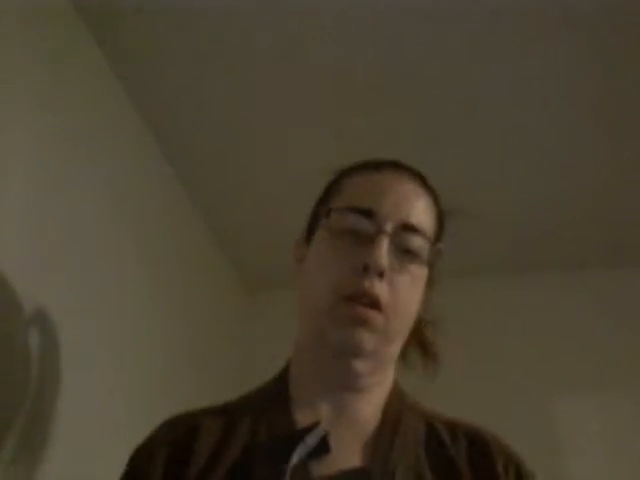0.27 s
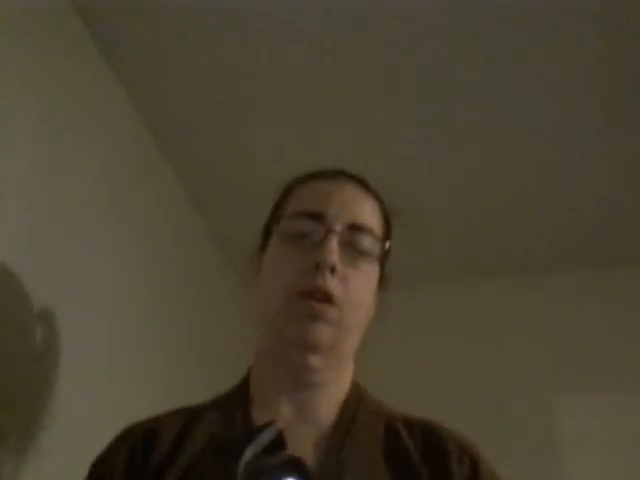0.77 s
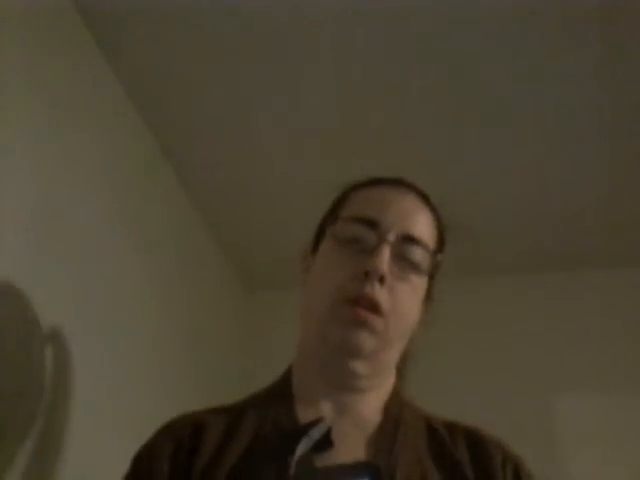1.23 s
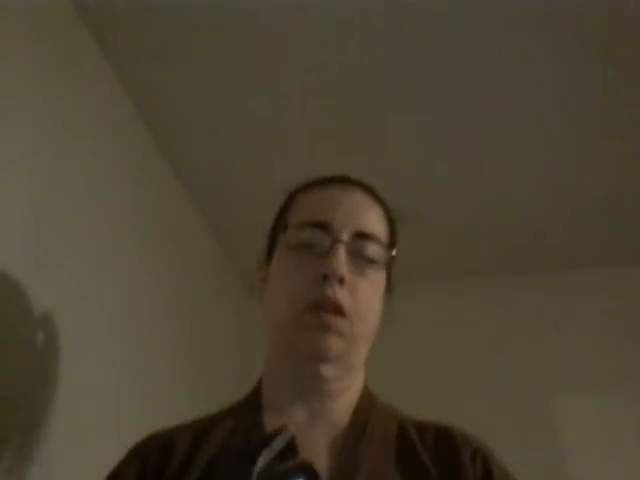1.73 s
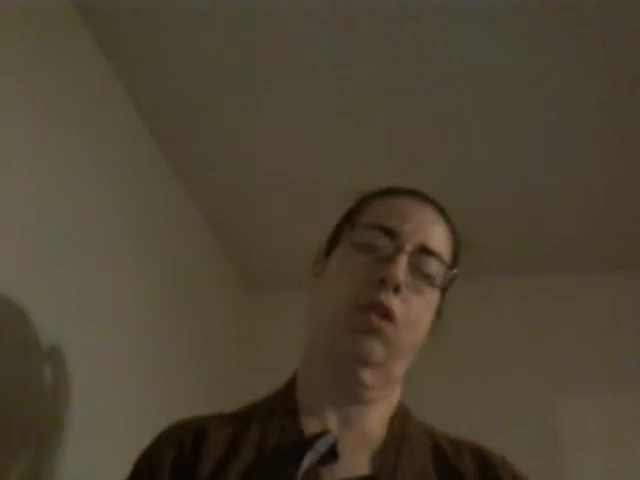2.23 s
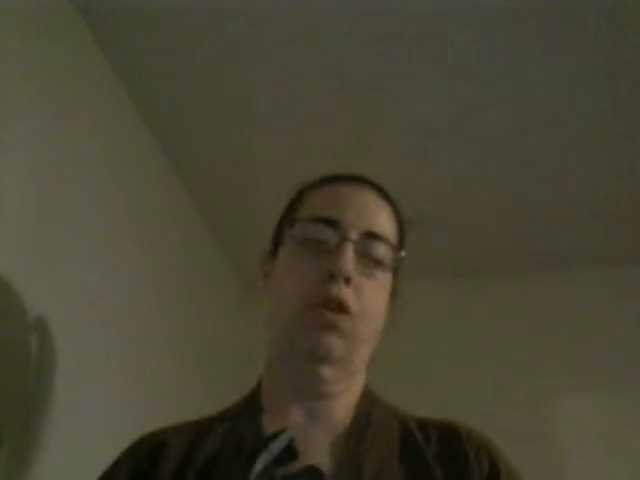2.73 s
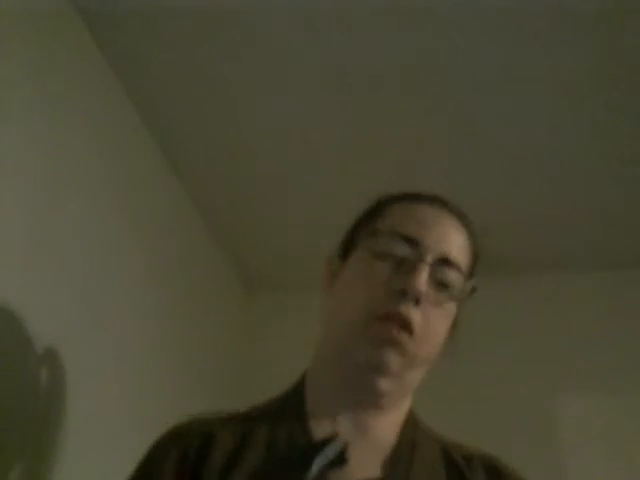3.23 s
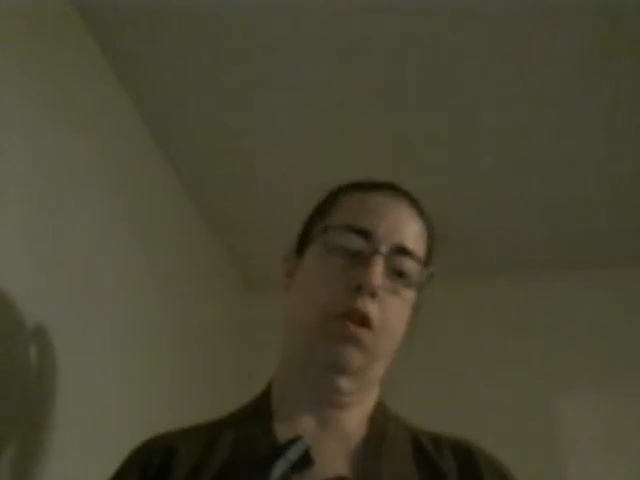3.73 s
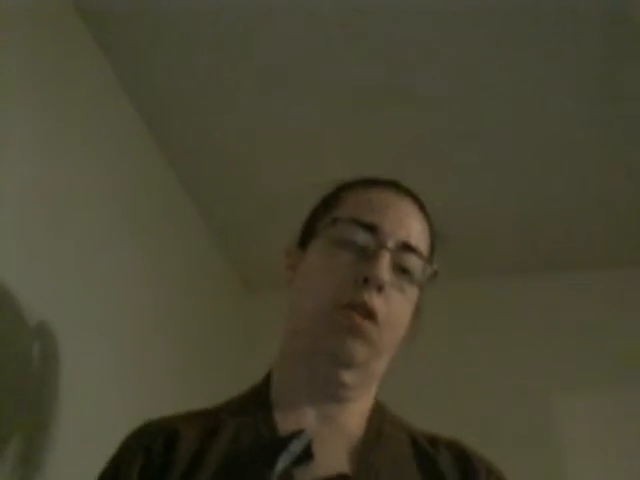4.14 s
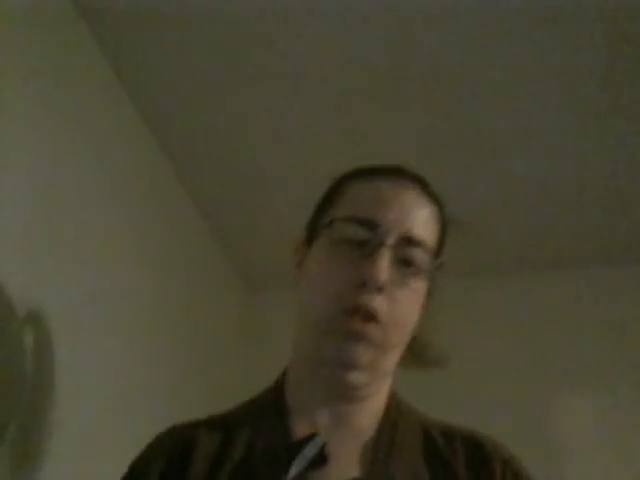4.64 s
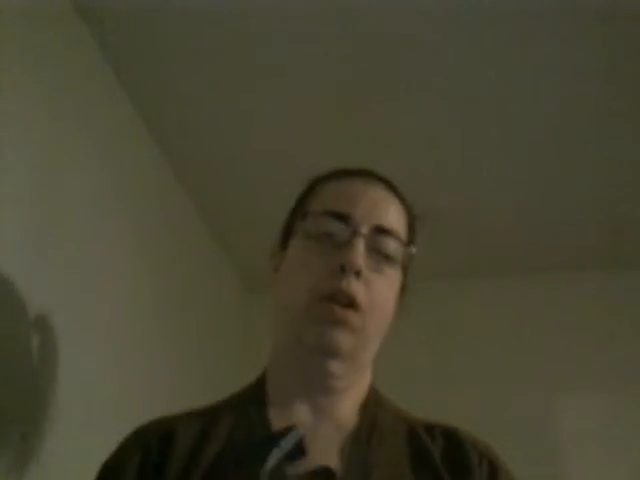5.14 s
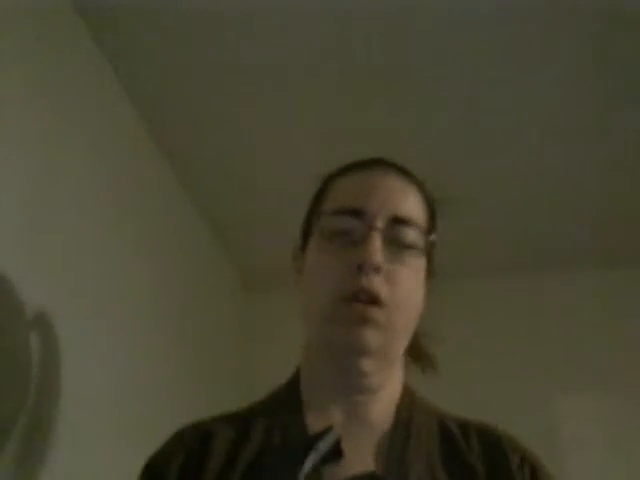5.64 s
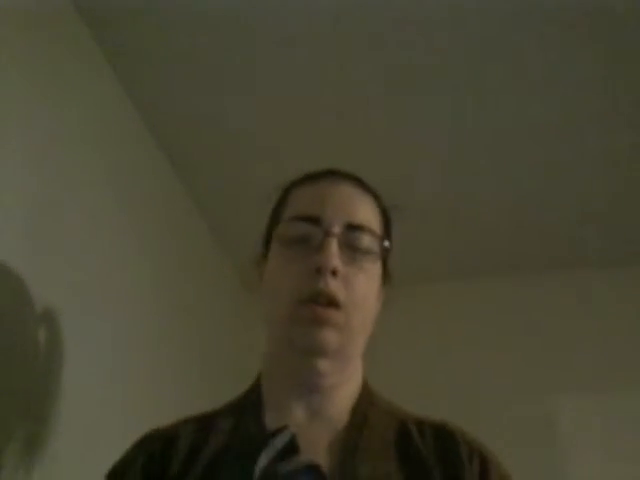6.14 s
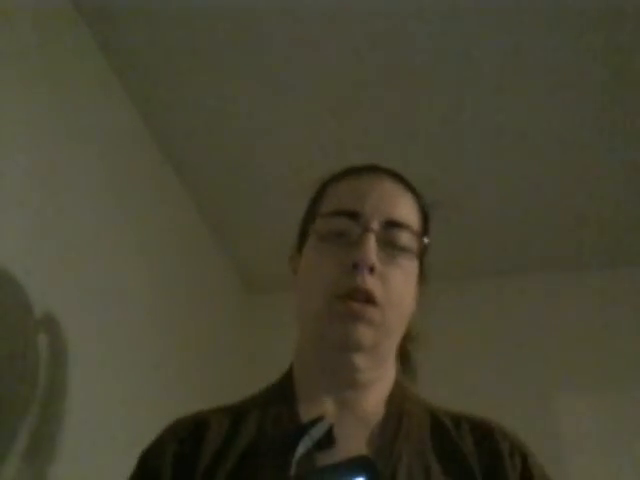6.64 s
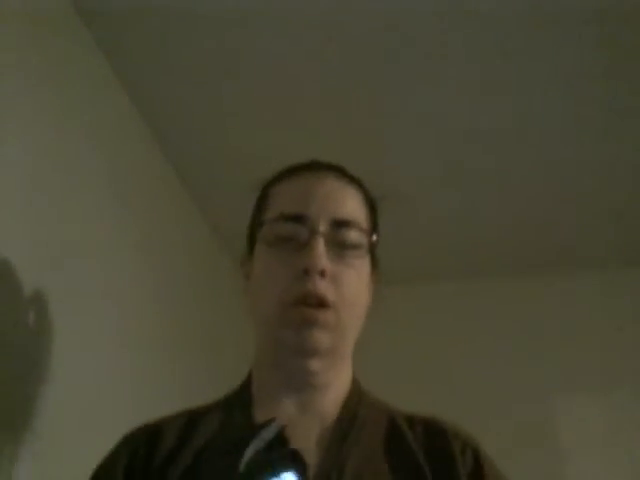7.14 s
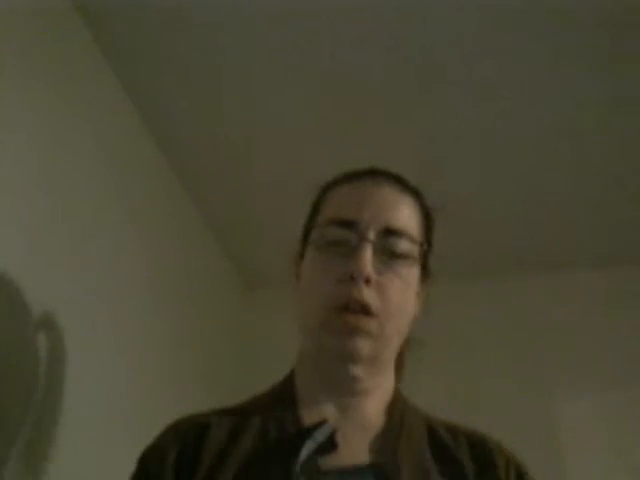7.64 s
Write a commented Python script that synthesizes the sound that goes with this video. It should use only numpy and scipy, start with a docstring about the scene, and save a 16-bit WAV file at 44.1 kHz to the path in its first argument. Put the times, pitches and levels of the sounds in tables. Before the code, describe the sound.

Someone walks steadily on a treadmill in a small room, feet thudding on the deck over a sagging motor whine and hiss, with early shoe squeaks.

```python
"""Someone walks on a treadmill in a small room, a little under two steps a second.
Motor whine, belt drone and noise hiss run throughout; in each step the shoe clacks off the belt and
brushes it twice, then heel and sole slap down, ring the deck modes and load it with rumble and grit.
Most of the stick-slip sole squeaks come in the first 2.3 s; the heavy foot's shoe ticks after full load.
The whine then sags and recovers by the next step; the last step slaps hardest."""
import sys
import numpy as np
from scipy import signal
from scipy.fft import rfft, irfft
from scipy.io import wavfile
from scipy.ndimage import uniform_filter1d

SR = 44100
rng = np.random.default_rng(int(sys.argv[2]) if len(sys.argv) > 2 else 0)


def persist_wave(psi):
    """Save psi, clipped to +-1, as 16-bit WAV."""
    counts = np.round(np.clip(psi, -1, 1) * 32767).astype(np.int16)
    wavfile.write(sys.argv[1], SR, np.atleast_2d(counts).T)


N = 347301
TIME = np.arange(N) / SR

# Steps, light and heavy foot by turns, light first. Each row: full load in seconds, lift-off lead and
# heel strike lead in seconds before it, then relative levels in dB of weight, thump, slap, sole grit,
# brush after lift-off and scuff before landing.
STEP_ROWS = [(0.069, .18, .028, -32.5, -27.5, -46, -42, -45, -36.5),
             (.587, 0.17, .054, -27.5, -17.5, -31, -33, -38, -47),
             (1.133, 0.17, 0.037, -30, -32, -48, -40.5, -58, -45),
             (1.676, 0.19, 0.067, -32.5, -22.5, -36, -35.5, -42, -45),
             (2.229, 0.18, 0.033, -29.5, -26, -34, -40, -53, -48),
             (2.758, .195, 0.057, -30.5, -24, -36.5, -36.5, -36, -44.5),
             (3.296, .18, 0.036, -32, -24, -33.5, -42.5, -40, -43.5),
             (3.824, 0.18, 0.053, -30, -23, -48, -34, -38, -46.5),
             (4.357, 0.16, .033, -29.5, -27.5, -33, -41.5, -40, -37.5),
             (4.886, 0.1874, .039, -30.5, -21.5, -33.5, -36.5, -37, -46),
             (5.41, .16, .034, -29.5, -29, -34, -42, -41.5, -41),
             (5.937, .178, 0.065, -30.5, -18.5, -37.5, -36, -40.5, -51),
             (6.475, 0.16, 0.032, -32, -28, -44, -41, -41, -40.5),
             (7.003, 0.1805, 0.068, -29.5, -21.5, -41, -34.5, -39.5, -48),
             (7.555, .18, 0.033, -24.5, -20.5, -23.5, -42, -45.5, -45)]


def amp(db):
    """Amplitude factor of a level in dB."""
    return 10 ** (np.asarray(db) / 20)


def unit(x):
    """Scales x to rms 1."""
    return x / np.sqrt(np.mean(x ** 2) + 1e-20)


def read(points, hz):
    """Interpolates a table of Hz and value on a log-frequency axis."""
    f, value = np.transpose(points)
    return np.interp(np.log(hz + 1), np.log(f + 1), value)


def colour(x, points):
    """Filters x by a spectrum table in dB."""
    hz = np.fft.rfftfreq(len(x), 1 / SR)
    return irfft(rfft(x) * amp(read(points, hz)), len(x))


def noise(points):
    """Steady Gaussian noise of rms 1 with the given spectrum."""
    return unit(colour(rng.standard_normal(N), points))


def wander(hz, size):
    """Random fluctuation, lowpassed at about hz; rms 1 before it is cut to size."""
    full = max(size, SR)
    f = np.fft.rfftfreq(full, 1 / SR)
    spectrum = rfft(rng.standard_normal(full)) * np.exp(-(f / hz) ** 2)
    return unit(irfft(spectrum, full))[:size]


def grains(points, per_s, smooth):
    """Tiny slips of uneven size over a smooth rub."""
    slips = rng.standard_normal(N) * (rng.random(N) < per_s / SR)
    rub = smooth * rng.standard_normal(N)
    return unit(colour(unit(slips) + rub, points))


def nearby(s):
    """The samples within a second of time s."""
    return slice(max(int((s - 1) * SR), 0), int((s + 1) * SR))


def swell(s, rise, fall):
    """A rounded hump at time s: Gaussian front, exponential tail."""
    out = np.zeros(N)
    lag = TIME[nearby(s)] - s
    front = -.5 * (lag / rise) ** 2
    tail = 1 - np.sqrt(1 + (lag / fall) ** 2)
    out[nearby(s)] = np.exp(np.where(lag < 0, front, tail))
    return out


def burst(s, rise, fall):
    """A quick rise from time s and an exponential fall."""
    out = np.zeros(N)
    t = np.maximum(TIME[nearby(s)] - s, 0)
    out[nearby(s)] = (1 - np.exp(-t / rise)) * np.exp(-t / fall)
    return out


def add(mix, s, sound):
    """Adds sound to mix in place, from time s."""
    part = mix[max(round(s * SR), 0):][:len(sound)]
    part += sound[:len(part)]


def room(x, wet_db):
    """Direct sound plus dense reflections whose decay time depends on frequency."""
    # Each row: frequency in Hz, t60 in s.
    decay = [(150, 0.35), (500, 0.47), (2000, 0.23), (5000, 0.29), (12000, 0.21)]
    size = SR // 2
    taps = rng.standard_normal(size) * (rng.random(size) < .1)
    taps *= np.arange(size) > SR // 300  # no reflection in the first 3.3 ms
    hz, t, z = signal.stft(taps, SR, nperseg=256)
    tail = signal.istft(z * amp(-60 * t / read(decay, hz)[:, None]), SR, nperseg=256)[1]
    wet = signal.fftconvolve(x, tail / np.linalg.norm(tail))[:N]
    return (x + amp(wet_db) * wet) / np.hypot(1, amp(wet_db))


def steps():
    """The step rows, each led by its foot: 0 light, 1 heavy."""
    return [(k % 2, *row) for k, row in enumerate(STEP_ROWS)]


def skims():
    """Each swing touches the belt after lift-off and before landing: (s, relative dB, width s)."""
    brush_lag_s, brush_width_s = (0.022, 0.023), (0.013, 0.014)  # light, heavy foot
    scuff_lead_s, scuff_width_s = 0.081, 0.0094
    rows = []
    for foot, s, swing_s, *_, brush_db, scuff_db in steps():
        rows.append((s - swing_s + brush_lag_s[foot], brush_db, brush_width_s[foot]))
        rows.append((s - scuff_lead_s, scuff_db, scuff_width_s))
    return rows


def blows():
    """Each step strikes with heel, then sole: (s, relative thump dB, relative slap dB)."""
    sole_lag_s = (0.0051, -0.00702)  # light, heavy foot, from full load
    sole_thump_db, sole_slap_db = (-6, 0), (-11.5, -4)  # relative to the heel
    rows = []
    for foot, s, _, heel_lead_s, _, thump_db, slap_db, *_ in steps():
        rows.append((s - heel_lead_s, thump_db, slap_db))
        rows.append((s + sole_lag_s[foot], thump_db + sole_thump_db[foot], slap_db + sole_slap_db[foot]))
    return rows


def hiss():
    """Steady coloured noise with a slight slow level wander."""
    # Each row: frequency in Hz, relative density in dB per Hz.
    spectrum = [(500, -0.5), (1600, -2.5), (2600, 0), (3300, -1.5), (4050, 1.5), (4800, -1.5), (6000, 5),
                (7500, 5), (9500, 0), (11500, -6), (13000, -17), (15000, -23)]
    return amp(-54.0) * noise(spectrum) * amp(0.31 * wander(3.0, N))


def whine_pitch():
    """Whine pitch in Hz: each step drags the motor down quickly, and it recovers by the next."""
    crest_hz, crest_lag_s = 417.85, 0.012  # before smoothing; lag after full load
    sag_s, recovery_power = 0.215, 1.7
    sag_hz, sag_hz_per_db = (54.54, 65.1), (0.5, 2.5)  # light, heavy foot; more weight, deeper sag
    usual_weight_db = -30.5
    crests = np.array([row[0] for row in STEP_ROWS]) + crest_lag_s
    stride_s = np.diff(crests).mean()
    crests = np.r_[crests[0] - stride_s, crests, crests[-1] + stride_s]  # the walk goes on either side
    sags = [sag_hz[1]]
    for foot, _, _, _, weight_db, *_ in steps():
        sags.append(sag_hz[foot] + sag_hz_per_db[foot] * (weight_db - usual_weight_db))
    pitch = np.full(N, crest_hz)
    for start, end, sag in zip(crests, crests[1:], sags):
        slowing = np.sin(np.pi / 2 * np.interp(TIME, [start, start + sag_s], [0, 1])) ** 2
        recovery = np.interp(TIME, [start + sag_s, end], [0, 1]) ** recovery_power
        pitch -= sag * slowing * (1 - recovery)
    return uniform_filter1d(pitch, size=1500)  # 34 ms


def motor():
    """A nearly pure whine follows the motor's speed through room modes, over belt and roller drone."""
    # Standing waves of the room, with a null. Each row: pitch in Hz, relative whine level in dB.
    standing = [(349, -40), (353, -49), (356, -54), (360, -47), (370, -42), (400, -39), (422, -47)]
    # Each row: frequency in Hz, relative density in dB per Hz.
    drone_spectrum = [(20, -44), (50, -20), (100, -12), (130, -7), (170, -1), (235, 2), (330, -0.5),
                      (480, -8), (640, -11), (720, -10), (830, -13), (1150, -17), (1600, -16), (3000, -29)]
    pitch = whine_pitch()
    phase = 2 * np.pi * np.cumsum(pitch * (1 + 0.0016 * wander(25, N))) / SR
    tone = np.sin(phase) + amp(-27.5) * np.sin(2 * phase)
    speeding_up = np.tanh(np.gradient(pitch) * SR / 100)  # louder while it gathers speed
    whine = unit(tone) * amp(read(standing, pitch) + 1.0 * speeding_up + 2.0 * wander(22, N))
    drone = amp(-49.0) * noise(drone_spectrum) * amp(1.53 * wander(8.7, N))
    return whine + drone


def brushes():
    """The swinging shoe skims the belt with a short bright hiss; cloth swishes more slowly."""
    # Each row: time in seconds, relative level in dB, rise width in seconds.
    swishes = [(2.44, -51.5, 0.12), (5.12, -53.5, 0.14), (6.58, -49, 0.05), (7.82, -52.5, 0.15)]
    # Shoe and cloth spectra. Each row: frequency in Hz, relative density in dB per Hz.
    shoe_spectrum = [(300, -51), (950, 2), (1500, -7), (2600, -6.5), (4000, -1), (5300, 1), (7200, 4),
                     (9500, -6), (12000, -11), (15000, -27)]
    cloth_spectrum = [(1500, -6), (3200, -8.5), (4050, -6), (4900, -11), (6000, 1.5), (7600, -8),
                      (10000, -13), (14000, -24)]
    shoe, cloth = np.zeros((2, N))
    for s, db, width in skims():
        shoe += amp(db) * swell(s - 0.21 * width, 0.79 * width, 1.42 * width)
    for s, db, width in swishes:
        cloth += amp(db) * swell(s, width, 0.81 * width)
    return room(shoe * grains(shoe_spectrum, 3000, 1.0) + cloth * noise(cloth_spectrum), wet_db=-6.0)


def ticks():
    """The heavy foot's shoe flexes just after full load: brief, jittery high chirps."""
    lag_s, peak_db, centre_hz, rise_s = 0.025, -28.5, 6700, 0.0026
    t = np.arange(SR // 30) / SR
    out = np.zeros(N)
    for s, *_ in STEP_ROWS[1::2]:
        phase = 2 * np.pi * np.cumsum(centre_hz * (1 + 0.088 * wander(1600, len(t)))) / SR
        u = t / rise_s
        add(out, s + lag_s, amp(peak_db) * u * np.exp(1 - u) * np.sin(phase))
    return room(out, wet_db=-13.0)


def squeaks():
    """Rubber sticks and slips in two rough tones; overtones and sum tones ride on a rasp."""
    # Each row: start in seconds, rise in seconds, length in seconds, upper pitch in Hz, pitch jitter
    # as a share, then relative levels in dB of upper tone with overtones, lower tone with sum tones,
    # and rasp.
    rows = [(0.57, .01, 0.0313, 2505, 0.019, -10, -50, -27.5),
            (1.109, 0.022, 0.043, 2087, 0.0087, -17.5, -21.5, -27.5),
            (1.653, 0.021, 0.066, 2136, 0.042, -32, -32.5, -36.5),
            (2.197, 0.012, 0.049, 2117, 0.025, -14, -19.5, -25.5),
            (4.322, .007, 0.03, 2324, .13, -37.5, -44, -54),
            (6.975, 0.012, 0.0526, 2486, .12, -30.5, -37, -48),
            (7.52, 0.016, 0.053, 2065, 0.032, -5.5, -16.5, -19)]
    # Each row: frequency in Hz, relative density in dB per Hz.
    rasp_spectrum = [(300, -15), (1000, 4.5), (1350, -10.5), (1700, -36), (2400, 11.5), (3000, 1),
                     (3750, 3), (4450, 0.5), (4950, 0), (6200, 7), (7200, 3.5), (8200, 2), (11000, -8.5),
                     (15000, -24)]
    glide, wobble, fade_db = 0.05, 0.013, -10.5  # shares of pitch; fade from rise to end
    highs, lows, rub = np.zeros((3, N))
    for s, rise, length, hz, jitter, db, lower_db, rasp_db in rows:
        size = max(int(length * SR), 64)
        t = np.arange(size) / SR
        slide = 1 + glide * t / length + wobble * wander(120, size)  # the grip changes
        grip = np.minimum(t / rise, 1) ** 1.43
        grip *= amp(fade_db * np.interp(t, [rise, length], [0, 1]))
        grip *= signal.windows.tukey(size, .15) * amp(2.4 * wander(205, size))
        upper, lower = (2 * np.pi * np.cumsum(f * slide * (1 + jitter * wander(800, size))) / SR
                        for f in (hz, .765 * hz))
        high = np.sin(upper) + amp(-13.5) * np.sin(2 * upper) + amp(-24) * np.sin(3 * upper)
        mixed = amp(-11.0) * np.sin(2 * lower) + amp(-6.0) * np.sin(upper + lower)
        mixed += amp(-14) * np.sin(2 * upper + lower)
        add(highs, s, grip * (amp(db) * high + amp(lower_db) * mixed))
        add(lows, s, grip * amp(lower_db) * np.sin(lower))
        rub += amp(rasp_db) * swell(s + rise, 0.51 * rise, 0.24 * length)  # the rasp outlasts the tone
    tones = room(highs, wet_db=-8.0) + room(lows, wet_db=-3.0)  # the lower tone lingers more
    rasp = room(amp(0.5) * rub * grains(rasp_spectrum, 2500, 0.82), wet_db=-2.5)
    return tones + rasp


def slaps():
    """The sole clacks softly as it leaves the belt and claps on it as it lands."""
    # Landing and leaving spectra. Each row: frequency in Hz, relative density in dB per Hz.
    slap_spectrum = [(200, -34), (400, 16.5), (560, 13.5), (750, 5), (1000, 3.5), (1300, -3), (1750, 0),
                     (2600, -5), (3400, -16), (5000, -37), (8000, -28), (14000, -49)]
    clack_spectrum = [(300, -8), (700, 3.5), (1000, 6), (1500, -5), (2200, -16), (5000, -38), (14000, -40)]
    clack_db = (-41, -53)  # light, heavy foot
    landing, leaving = np.zeros((2, N))
    for s, _, db in blows():
        landing += amp(db) * burst(s, 0.0026, 0.016)
    for foot, s, swing_s, *_ in steps():
        leaving += amp(clack_db[foot]) * burst(s - swing_s, 0.0009, 0.014)
    slap = amp(3.0) * landing * grains(slap_spectrum, 1500, 0.68)
    return room(slap + leaving * noise(clack_spectrum), wet_db=-7.0)


def footfalls():
    """Under the walker's weight the belt drags over the deck: low rumble and sole grit."""
    # Rumble and grit spectra. Each row: frequency in Hz, relative density in dB per Hz.
    rumble_spectrum = [(20, -52), (60, -20), (100, -11.5), (132, -15), (160, 4.5), (200, 3.5), (260, 1.5),
                       (330, 3), (480, -4), (700, -13), (1100, -18), (3000, -47)]
    grit_spectrum = [(200, -32), (600, 3.5), (1050, 7), (1350, 2), (1750, 2), (2600, 3.5), (3200, 1),
                     (4200, -1), (5200, -2), (7000, 1.5), (10000, -8), (14000, -32)]
    rumble_rise_s, rumble_fall_s, grit_width_s = 0.05117, 0.04988, 0.03526
    rumble, grit = np.zeros((2, N))
    for _, s, _, _, weight_db, _, _, grit_db, *_ in steps():
        rumble += amp(weight_db) * swell(s, rumble_rise_s, rumble_fall_s)
        grit += amp(grit_db) * swell(s, grit_width_s, grit_width_s)
    grit *= amp(2.6 * wander(60, N))  # the sole grips and lets go in patches
    low = amp(-4.0) * rumble * grains(rumble_spectrum, 500, 0.91)
    return low + amp(-2.5) * room(grit * grains(grit_spectrum, 700, 1.0), wet_db=-7.5)


def thumps():
    """Each blow rings the deck's damped modes, a little differently for each place the foot lands."""
    # Deck modes. Each row: nominal frequency in Hz, relative level in dB, t60 in s.
    deck = [(162.3, 1.5, 0.12), (192.5, -6, 0.19), (240.6, -20, 0.66), (283.6, -11, 0.26),
            (329.5, -15, 0.29), (453, -5.5, 0.099), (569, -12, 0.19)]
    # Deck radiation: weak at the very bottom and around 135 Hz, fuller near 110 Hz and above 155 Hz.
    # Each row: frequency in Hz, gain in dB.
    radiation = [(40, -14), (110, 1), (135, -11), (155, -1)]
    t = np.arange(SR // 3) / SR
    out = np.zeros(N)
    hz, db, t60 = np.transpose(deck)[:, :, None]
    upper = np.arange(len(deck))[:, None] > 0  # only upper modes vary in level and phase
    cushion = 1 - np.exp(-(t / 0.011) ** 2)  # the soft sole softens the start
    for s, blow_db, _ in blows():
        detune, share, turn = rng.standard_normal((3, len(deck), 1))
        level = amp(db + 3.5 * upper * share - 60 * t / t60)
        modes = level * np.sin(2 * np.pi * (hz * (1 + 0.017 * detune) * t + upper * turn))
        add(out, s, amp(blow_db) * modes.sum(0) * cushion)
    return room(colour(out, radiation), wet_db=-10.5)


def scene():
    """Treadmill and walker with a steady hiss, the same in both ears."""
    machine = hiss() + motor()
    shoes = brushes() + ticks() + squeaks() + slaps()
    mono = machine + shoes + footfalls() + thumps()
    return np.array([mono, mono])


def record(dry):
    """Peaks above the knee round off, then a lowpass limits the band."""
    knee, headroom, edge_hz = 0.7, 0.22, 14650
    over = np.maximum(abs(dry) - knee, 0)
    rounded = np.sign(dry) * (abs(dry) - over + headroom * np.tanh(over / headroom))
    lowpass = signal.firwin(511, edge_hz, window=("kaiser", 9), fs=SR)
    return signal.oaconvolve(rounded, lowpass[None], "same")


dry = scene()
out = record(dry)
persist_wave(out)
```